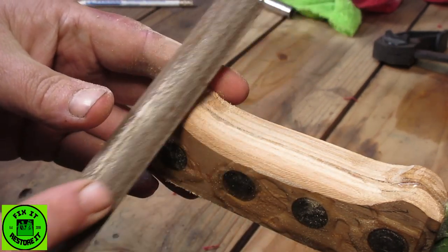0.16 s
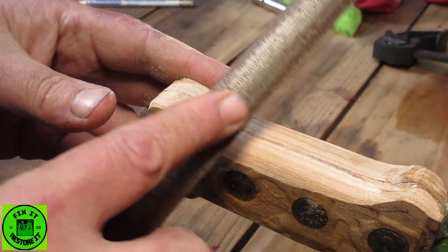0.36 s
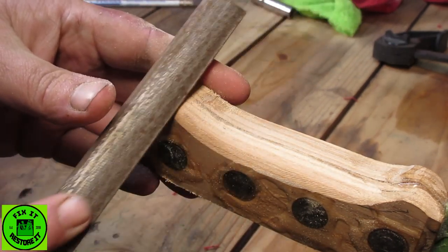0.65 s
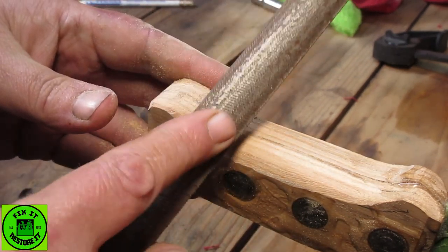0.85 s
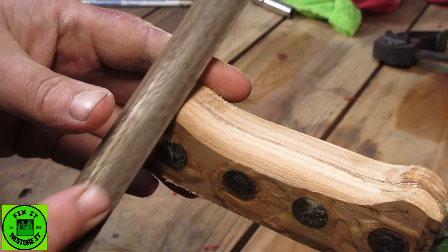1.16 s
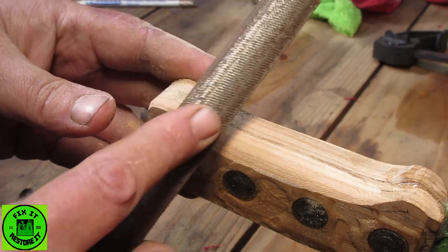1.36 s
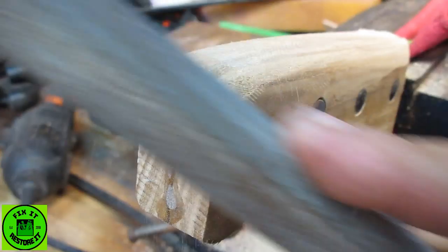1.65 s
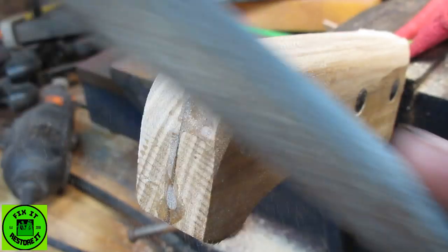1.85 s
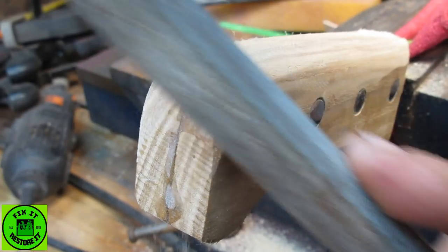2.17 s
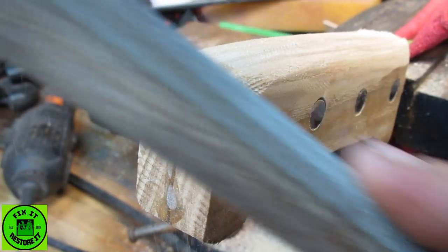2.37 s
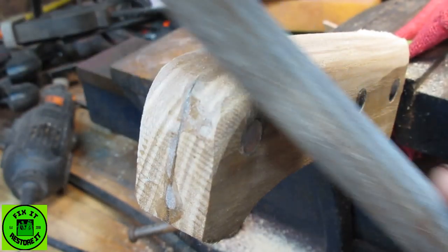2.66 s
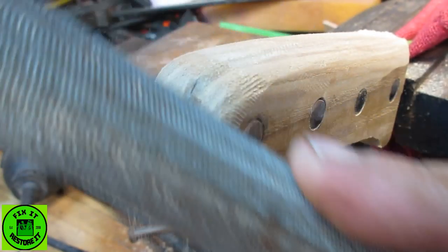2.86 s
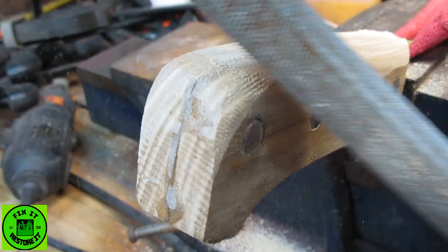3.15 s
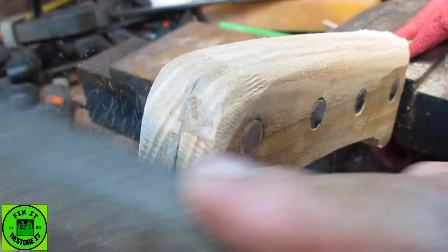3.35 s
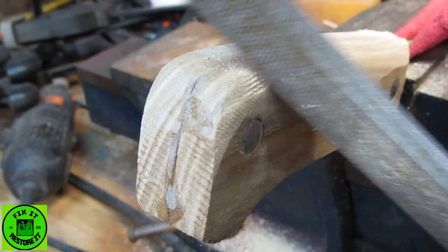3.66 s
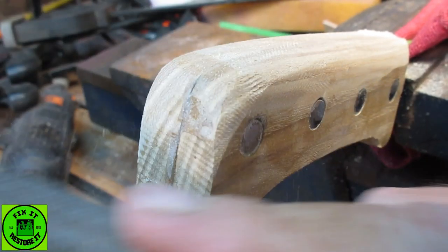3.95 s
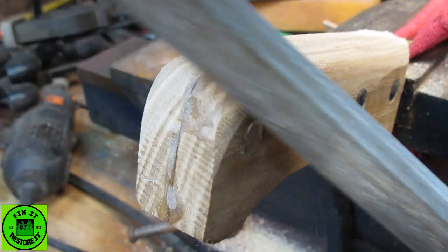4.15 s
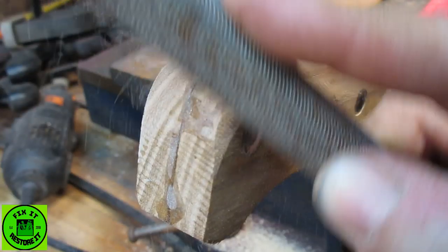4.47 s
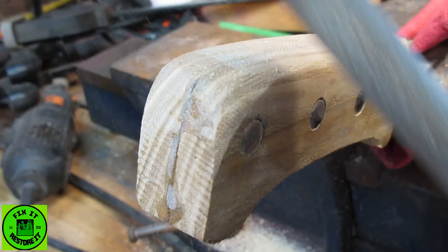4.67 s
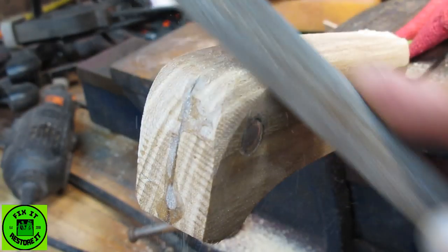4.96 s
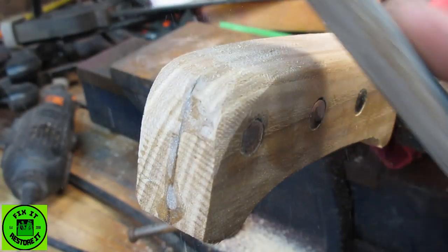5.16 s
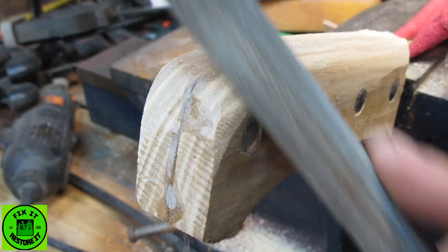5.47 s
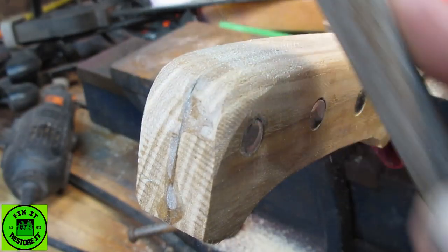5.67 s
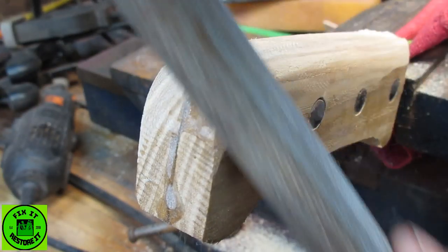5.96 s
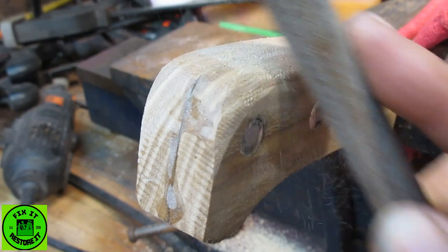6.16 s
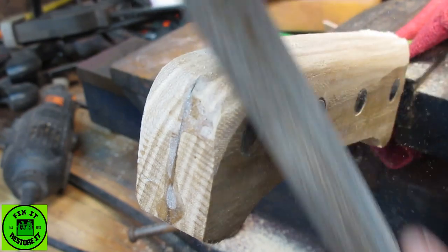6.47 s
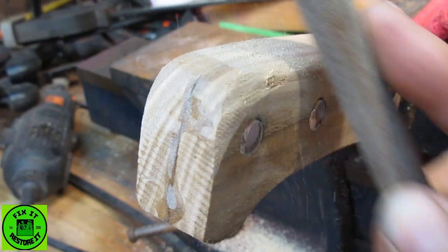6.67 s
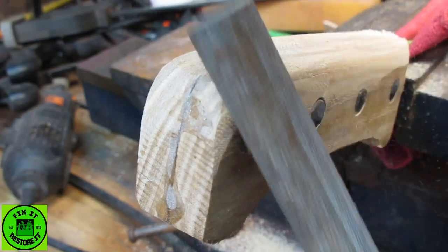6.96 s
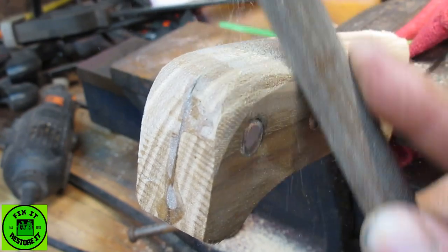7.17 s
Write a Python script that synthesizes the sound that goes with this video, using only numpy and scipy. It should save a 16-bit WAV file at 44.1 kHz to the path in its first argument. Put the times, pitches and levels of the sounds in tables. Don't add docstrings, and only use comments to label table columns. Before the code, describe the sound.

Fourteen brief filing strokes on wood, each starting with a tap; faint and dull first, then suddenly close, gritty and buzzing in a quiet workshop.

```python
import sys
import numpy as np
from scipy import signal
from scipy.io import wavfile
from scipy.ndimage import uniform_filter1d

SR = 44100
rng = np.random.default_rng(int(sys.argv[2]) if len(sys.argv) > 2 else 0)


def unload_wav(signal):
    wavfile.write(
        sys.argv[1],
        SR,
        np.round(np.clip(np.atleast_2d(signal).T, -1, 1) * 32767).astype(np.int16),
    )


def gain_from_db(level_db):
    decades = np.asarray(level_db, float) / 20
    return 10 ** decades


N = 322812
CLOSE_S = 1.52


def filing():
    return handle_and_steel(pushes() + landings() + catches())


# start in s, bite in s, cutting there in dB, lift in s, cutting there in dB.
PUSH_WEIGHT = [(0.158, 0.235, -37, 0.33, -41.5), (.72, 0.79, -38.5, 0.86, -43),
               (1.21, 1.289, -34, 1.384, -40), (1.59, 1.64, -32, 1.734, -21.5),
               (2.145, 2.222, -21, 2.29, -21), (2.68, 2.775, -15.5, 2.862, -29),
               (3.255, 3.322, -18.5, 3.399, -30.5), (3.759, 3.812, -14.5, 3.89, -28.5),
               (4.3, 4.37, -8.5, 4.363, -25), (4.399, 4.471, -14.5, 4.488, -15),
               (4.875, 4.987, -18, 5.066, -32.5), (5.424, 5.498, -18.5, 5.58, -19),
               (5.975, 6.048, -14.5, 6.12, -12.5), (6.11, 6.129, -22, 6.16, -37),
               (6.512, 6.65, -14.5, 6.705, -30), (7.032, 7.112, -18.5, 7.2, -19)]
# up to speed in s, tooth rows per s, braking from s, tooth rows per s, braking in rows per s2.
HAND_SPEED = [(.2, 194, .31, 195, 530), (.76, 197, .845, 200, 660), (1.28, 272, 1.38, 340, 1640),
              (1.69, 294, 1.754, 320, 4900), (2.195, 335, 2.32, 286, 2830), (2.74, 312, 2.85, 281, 2440),
              (3.335, 392, 3.42, 301, 3800), (3.8, 218, 3.86, 294, 1800), (4.36, 213, 4.385, 225, 920),
              (4.44, 513, 4.51, 464, 5400), (4.98, 225, 5.0, 295, 1290), (5.5, 335, 5.6, 307, 3870),
              (6.03, 381, 6.095, 324, 3730), (6.17, 248, 6, 270, 2240), (6.585, 335, 6.65, 272, 556),
              (7.11, 390, 7.2, 487, 4000)]
# first skid in dB re the bite, strongest throb in s, throb in dB,
# overtones in dB, fading in dB per s.
SEATING = [(-13.5, 0.222, -45, -3, 170), (-8, 0.774, -44.5, -2, 200), (-14, 1.284, -30.5, -4, 170),
           (-16, 1.728, -13.5, -7, 332), (-19.5, 2.24, -9, -3, 195), (-28, 2.768, -12.5, -2.5, 170),
           (-12, 3.301, -19.5, -6.5, 136), (-33, 3.795, -22, -13, 69), (-39.5, 4.36, -20, -7, 400),
           (-18.5, 4.46, -34.5, 1, 60), (-21.5, 4.98, -27, -15, 14), (-25, 5.492, -17, -11.5, 40),
           (-24, 6.04, -13.5, -28, 162), (-5, 6.14, -41.5, 0.5, 80), (-28, 6.636, -19, 6, 240),
           (-25, 7.135, -20, -8, 72)]
# steady from s, level in dB, stops at s, level in dB, dying in dB per s.
GRIT_HISS = [(.23, -48.5, 0.31, -42.5, 430), (.78, -46.5, 0.851, -43, 430), (1.28, -43, 1.369, -40.5, 600),
             (1.7, -37, 1.741, -32.5, 552), (2.23, -32.5, 2.317, -37, 600), (2.74, -38, 2.845, -37, 382),
             (3.31, -36, 3.4, -39.5, 900), (3.83, -37, 3.915, -38.5, 1100), (4.36, -42, 4.4, -42, 300),
             (4.46, -34.5, 4.48, -33, 700), (4.97, -38.5, 5.04, -32, 498), (5.54, -32.5, 5.586, -26, 1000),
             (6.04, -31, 6.095, -27, 3000), (6.125, -46, 6.17, -46, 450), (6.6, -35, 6.664, -29.5, 448),
             (7.14, -31.5, 7.245, -38.5, 900)]
LEAVING_DB_PER_S = [330, 330, 400, 400, 350, 410, 608, 800, 300, 480, 400, 500, 900, 250, 410, 300.9]


def pushes():
    forces = np.zeros((4, N))
    for rows in zip(PUSH_WEIGHT, HAND_SPEED, SEATING, GRIT_HISS, LEAVING_DB_PER_S):
        start_s = rows[0][0]
        add(forces, start_s, stroke(*motion(*rows)))
    return forces


def motion(push, hand, seating, grit, leaving):
    start, bite, bite_db, lift, lift_db = push
    full, fast, brake, last, braking = hand
    skid_db, shake, throb_db, octave_db, fading = seating
    steady, steady_db, stop, stop_db, dying = grit
    first_rate, lowest_rate = 190, 170
    lift_db_per_s2, lift_s = 1499.5, 0.12
    throb_rise_db_per_s, throb_lift = 420.5, 0.37
    overtones_rise_db_per_s, overtones_late_s = 200.5, 0.036
    vice_hz, vice_width_hz, vice_db = 184, 19, 8
    t = np.arange(start, max(lift, stop - .03) + lift_s, 1 / SR)

    def since(s):
        return np.maximum(t - s, 0)

    def rising(s, bend):
        return 1 - np.clip((t - start) / (s - start), 0, 1) ** bend

    rate = np.interp(t, [start, full, brake], [first_rate, fast, last])
    rate = np.maximum(rate - braking * since(brake), lowest_rate)

    lifted_db = leaving * since(lift) + lift_db_per_s2 * since(lift) ** 2
    cut_db = np.interp(t, [bite, lift], [bite_db, lift_db]) - lifted_db
    cut_db = cut_db + skid_db * rising(bite, 1.29)

    throb_db = throb_db - throb_rise_db_per_s * np.maximum(shake - t, 0)
    throb_db = throb_db - fading * since(shake) - throb_lift * lifted_db
    throb_db = throb_db + (t > shake) * vice_db / (1 + ((rate - vice_hz) / vice_width_hz) ** 2)
    octave_db = octave_db - overtones_rise_db_per_s * np.maximum(shake + overtones_late_s - t, 0)

    hiss_db = np.interp(t, [steady, stop], [steady_db, stop_db]) - dying * since(stop)
    hiss_db = hiss_db - 20 * rising(steady, 0.73)
    dust_db = -7.5 - 109 * since(stop)
    return t, rate, throb_db, octave_db, cut_db, hiss_db, dust_db


def stroke(t, rate, throb_db, octave_db, cut_db, hiss_db, dust_db):
    torn_share, jitter = (.5, .025) if t[0] > CLOSE_S else (.8, .05)
    turns = np.cumsum(rate * (1 + jitter * drift(len(t), 150))) / SR
    uneven = evened(gain_from_db(1.5 * rng.standard_normal(200)))
    size = uneven[turns.astype(int) % 200]
    bites = np.diff(np.floor(turns), prepend=0) * size * np.sqrt(SR / rate)

    gate = size * (0.88 + np.exp(-(turns % 1) / 0.3))
    fibres = evened(gate * rng.standard_normal(len(t)) * gain_from_db(3.5 * drift(len(t), 12)))
    cutting = gain_from_db(cut_db) * (np.sqrt(1 - torn_share) * bites + np.sqrt(torn_share) * fibres)

    hiss = (gate + 4.1) * rng.standard_normal(len(t)) * gain_from_db(1.2 * drift(len(t), 40))
    grit = gain_from_db(hiss_db) * evened(hiss)
    dust = gain_from_db(dust_db) * grit

    overtones = np.cos(4 * np.pi * turns) + gain_from_db(-10) * np.cos(6 * np.pi * turns)
    sway = gain_from_db(2.26 * drift(len(t), 200))
    throb = gain_from_db(throb_db) * sway * (np.cos(2 * np.pi * turns) + gain_from_db(octave_db) * overtones)
    return signal.windows.tukey(len(t), .1) * np.array([small(throb), cutting, grit, dust])


# start in s, peak in dB, brightness in dB, thump into the bench in dB.
LANDINGS = [(0.116, -28.5, -41, -41.5), (0.666, -20, -40, -37), (1.172, -28, -49, -43.5),
            (1.566, -26.5, -28, -63), (2.146, -29.5, -3.5, -43), (2.679, -30, -7, -54),
            (3.252, -21, -5, -47), (3.762, -25.5, -6, -44), (4.259, -20.5, -13.5, -46),
            (4.865, -17.5, -9, -44), (5.417, -14, -8.5, -35.5), (5.968, -13.5, -10.5, -38),
            (6.499, -27.5, -19.5, -43), (6.993, -16, -15.5, -36.5)]


def landings():
    forces = np.zeros((4, N))
    for s, *blow in LANDINGS:
        knock, rattle = landing(*blow)
        add(forces, s, np.array([knock, rattle, gain_from_db(-9.5) * rattle, gain_from_db(-22.5) * rattle]))
    return forces


# frequency in Hz, level in dB, t60 in s.
KNOCK_MODES = [(186, -10.5, 0.8), (375, -5, 0.17), (500, 7, 0.017), (710, 12.5, 0.019), (860, 11.5, 0.0078),
               (1035, 1.5, 0.022), (1290, -9, 0.028)]


def landing(db, bright_db, thump_db):
    t = np.arange(12000) / SR
    noise = rng.standard_normal(len(t))
    blow = noise * gain_from_db(-60 * t / .13) + 6 * (t == 0)
    knock = small(signal.oaconvolve(blow, ringing(KNOCK_MODES, 0.38))[:len(t)])
    knock = gain_from_db(db - 2.0) * knock / abs(knock).max()
    thump = signal.sosfilt(signal.butter(3, [55, 110], "band", fs=SR, output="sos"), noise)
    thump = gain_from_db(thump_db + 23.0 - 60 * t / 0.68) * (1 - np.exp(-t / 0.041)) * thump
    rattle = gain_from_db(db + bright_db - 3.5 - 60 * t / 0.037) * noise
    return knock + thump, rattle


# time in s, peak in dB.
CATCHES = [(2.2053, -14.0), (2.2455, -9.6), (2.2544, -15.8), (2.2893, -11.0), (2.7666, -5.1),
           (2.7729, -1.6), (2.7831, -3.3), (3.2908, -10.1), (3.3152, -11.3), (3.7961, -16.6),
           (3.8134, -7.9), (3.8177, -3.6), (4.3515, -13.0), (4.3601, -5.7), (4.3649, -0.6), (4.3727, -3.5),
           (4.3764, -2.9), (4.386, -7.0), (4.4802, -5.0), (4.9853, -9.9), (5.603, -13.4), (6.046, -6.4),
           (6.1056, 0.0), (6.1093, -0.8), (6.1136, -0.5), (7.1344, -10.4)]


def catches():
    forces = np.zeros((4, N))
    throb, cutting, grit, dust = forces
    u = np.arange(-22, 23) / SR
    snap = np.cos(2 * np.pi * 2100 * u + .8) * np.exp(-(u / .00019) ** 2)
    for s, db in CATCHES:
        add(throb, s + u[0], gain_from_db(db + .3) * snap)
        add(throb, s, gain_from_db(2 * db - 17) * np.ones(1))
        add(cutting, s, gain_from_db(db - 4.0) * np.ones(2))
        add(grit, s, gain_from_db(db - 11.5) * np.ones(1))
        add(dust, s, gain_from_db(db - 20.5) * np.ones(1))
    return forces


# frequency in Hz, width in Hz, level in dB.
LIGHT_MODES = [(539, 35, 10), (1022, 43, 12.5), (1450, 50, 5), (2790, 25, -6), (3315, 52, -4.5),
               (4180, 28, -12.5), (4560, 29, -34), (5300, 99, -26), (6350, 47, -26), (6880, 110, -45),
               (7430, 130, -22.5), (8320, 71, -29.5)]
# frequency in Hz, level in dB per Hz.
LIGHT_BROAD = [(180, -21), (300, 11), (482, -6), (541, 2), (726, 4.5), (1420, -3), (1880, -9.5),
               (3270, -14), (7540, -35.5), (15000, -37.5)]
# frequency in Hz, width in Hz, level in dB.
HEAVY_MODES = [(552, 94, 3), (759.3, 7.7, 8.5), (955, 20, 6.5), (1293, 93, 7), (1710, 151, 8),
               (2433, 13, -16), (2748, 48, 3), (3913, 258, -2), (5360, 26, -23), (5420, 34, -18.5),
               (6040, 49, -56), (6430, 25, -50), (6910, 290, -21.5), (7680, 110, -24.5), (8730, 130, -24),
               (9660, 70, -45), (10750, 100, -32), (11500, 67, -38.5), (12470, 120, -31.5)]
# frequency in Hz, level in dB per Hz.
HEAVY_BROAD = [(180, -25.5), (300, 0.5), (682, -6.5), (777, -20.5), (1120, -24.5), (1310, -7.5),
               (2800, -10), (3460, -14), (3890, -9), (4970, -22), (12700, -47), (15200, -64.5)]
# frequency in Hz, level in dB, t60 in s.
BENCH_MODES = [(162, -2, .25), (184, 0, .25), (262, 1, .36), (303, -8, .2), (505, -5, .3), (940, -9, .2)]


def handle_and_steel(forces):
    throb, cutting, grit, dust = forces
    close = np.arange(N) / SR > CLOSE_S
    rasp, fizz = np.zeros((2, N))
    for on, modes, broad in ((~close, LIGHT_MODES, LIGHT_BROAD), (close, HEAVY_MODES, HEAVY_BROAD)):
        rasp += signal.oaconvolve(on * cutting, body(modes, broad, 0.88, 332, 5200))[:N]
        fizz += signal.oaconvolve(on * grit, body(modes, broad, -3.0, 5280, 10430))[:N]
        fizz += signal.oaconvolve(on * dust, body(modes, broad, -2.2, 8400, 15900))[:N]
    out = throb + wandering(rasp, 2.1, 12, 4) + wandering(fizz, 2.9, 14, 4)
    return out + gain_from_db(-57.5) * signal.oaconvolve(close * out, ringing(BENCH_MODES, .5))[:N]


def body(modes, broad, broad_db, lo_hz, hi_hz):
    hz = abs(np.fft.fftfreq(8192, 1 / SR)) + 1
    power = gain_from_db(read(broad, hz) + broad_db) ** 2
    for f, width, db in modes:
        width = max(width, 35 + f / 70)
        power = power + gain_from_db(db) ** 2 / (1 + (2 * (hz - f) / width) ** 2) ** 1.303
    power = power / (1 + (lo_hz / hz) ** 8) / (1 + (hz / hi_hz) ** 9)
    log_gain = .5 * np.log(power + 1e-12)
    minimum_phase = signal.hilbert(log_gain).imag
    response = np.fft.ifft(np.exp(log_gain - 1j * minimum_phase)).real[:4096]
    return response / np.linalg.norm(response)


def wandering(x, patchy_db, bins, frames):
    z = signal.stft(x, nperseg=1024, noverlap=768)[2]
    z = z * gain_from_db(patchy_db * patches(bins, frames)[:, :z.shape[1]])
    return signal.istft(z, nperseg=1024, noverlap=768)[1][:N]


# frequency in Hz, t60 in s.
WALL_DECAY = [(150, 0.38), (1000, 0.2), (4000, 0.095), (12000, 0.15)]


def walls(x):
    taps = np.zeros(SR // 2)
    at = np.arange(200, len(taps) - 20, 20)
    at = at + rng.integers(0, 20, len(at))
    taps[at] = rng.choice([-1., 1.], len(at))
    hz, t, z = signal.stft(taps, SR, nperseg=256)
    decay = gain_from_db(-60 * t / read(WALL_DECAY, hz)[:, None])
    tail = signal.istft(z * decay, SR, nperseg=256)[1]
    return signal.oaconvolve(x, tail / np.linalg.norm(tail))[:N]


# time in s, level in dB.
HUM_LEVEL = [(0.051, -54.5), (.3, -56.5), (.6, -55), (1.08, -55.3), (1.5, -55), (2.0, -52), (2.582, -50.5),
             (3.149, -53), (3.62, -51.5), (4.1, -47.5), (4.75, -54.5), (5.3, -52.5), (5.85, -49.5),
             (6.3, -60.5), (6.45, -58), (6.9, -52)]
# frequency in Hz, level in dB per Hz.
HUM_COLOUR = [(12, -26.5), (20, -4), (53, 3.5), (103, -9), (124, -7), (445, -9), (555, -9), (713, -4),
              (865, -14.5), (1050, -7), (1420, -16), (1930, -20.5), (15000, -43)]
# frequency in Hz, level in dB per Hz.
DRAG_COLOUR = [(880, -24), (1500, 5.5), (1670, 2.5), (2290, -4.5), (3480, -6.5), (3830, -9.5), (4870, -13),
               (8570, -15), (14800, -32.5)]


def shop():
    hum_db = np.interp(np.arange(N) / SR, *np.transpose(HUM_LEVEL))
    drag_db = -65 + 1.28 * (hum_db + 55)
    hum = gain_from_db(hum_db) * shaped_noise(HUM_COLOUR, 0.97)
    drag = gain_from_db(drag_db + 0.4 * drift(N, 300)) * shaped_noise(DRAG_COLOUR, 1.0)
    return hum + drag


def shaped_noise(colour, patchy_db):
    hz = np.fft.rfftfreq(1024, 1 / SR)
    a, b = rng.standard_normal((N // 256 + 5, 513, 2)).T
    z = (a + 1j * b) * gain_from_db(read(colour, hz)[:, None] + patchy_db * patches(8, 8))
    return evened(signal.istft(z, nperseg=1024, noverlap=768)[1][:N])


def patches(bins, frames):
    chance = rng.standard_normal((N // 256 + 5, 513)).T
    for _ in range(2):
        chance = uniform_filter1d(chance, size=bins, axis=0)
        chance = uniform_filter1d(chance, size=frames, axis=1)
    return evened(chance)


def ringing(modes, seconds):
    t = np.arange(round(seconds * SR)) / SR
    return sum(gain_from_db(db - 60 * t / t60) * np.sin(2 * np.pi * hz * t) for hz, db, t60 in modes)


def small(x):
    return signal.sosfilt(signal.butter(4, 150, "high", fs=SR, output="sos"), x)


def drift(count, span):
    chance = uniform_filter1d(rng.standard_normal(count), span)
    return evened(uniform_filter1d(chance, span))


def evened(x):
    return x / np.sqrt(np.mean(x ** 2) + 1e-20)


def read(points, hz):
    f, value = np.transpose(points)
    return np.interp(np.log(hz + 1), np.log(f + 1), value)


def add(mix, s, sound):
    part = mix[..., round(s * SR):][..., :sound.shape[-1]]
    part += sound[..., :part.shape[-1]]


def scene():
    near = filing()
    return (near + gain_from_db(-11.5) * walls(near) + shop())[None]


def low_pass(x):
    return signal.sosfilt(signal.butter(12, 15330, fs=SR, output="sos"), x)


def record(dry):
    heard = signal.sosfilt(signal.butter(3, 40, "high", fs=SR, output="sos"), dry)
    heard = signal.oaconvolve(heard, signal.firwin(255, 15100, fs=SR)[None], "same")
    return low_pass(np.clip(heard, -.98, .98))


dry = scene()
out = record(dry)
unload_wav(out)
```